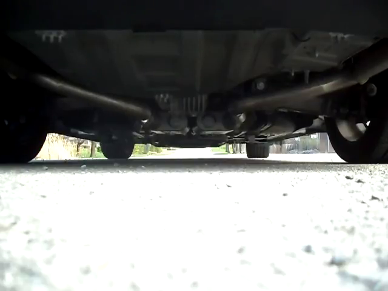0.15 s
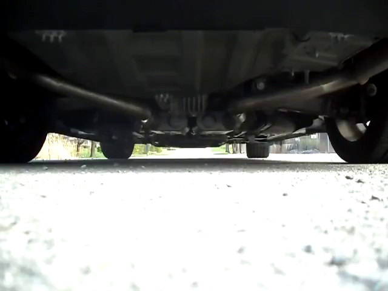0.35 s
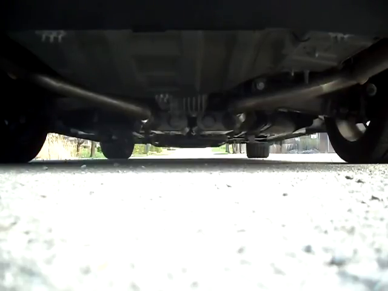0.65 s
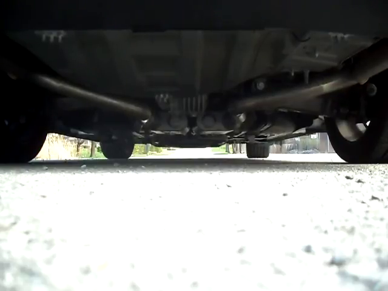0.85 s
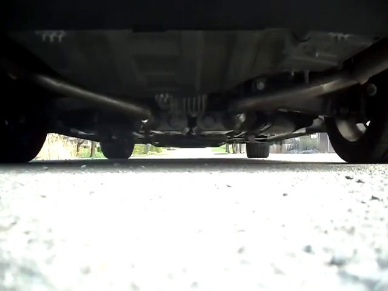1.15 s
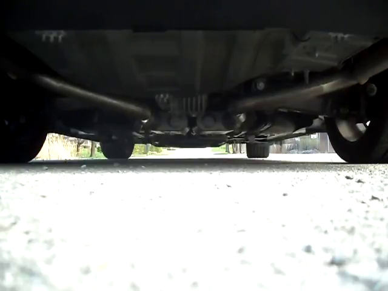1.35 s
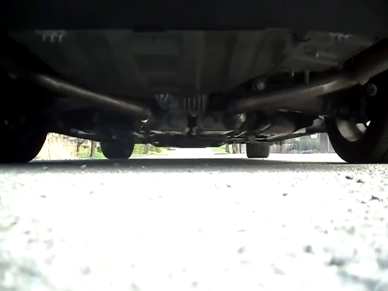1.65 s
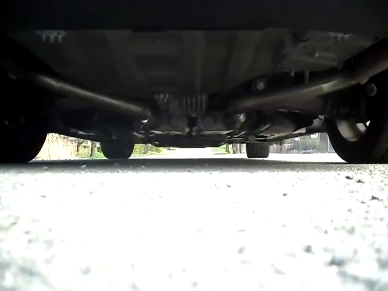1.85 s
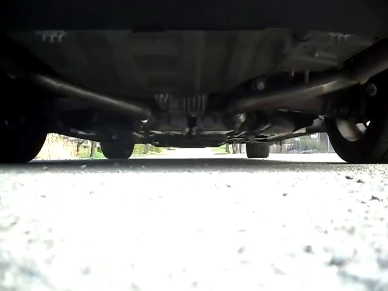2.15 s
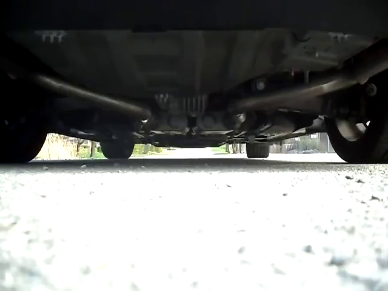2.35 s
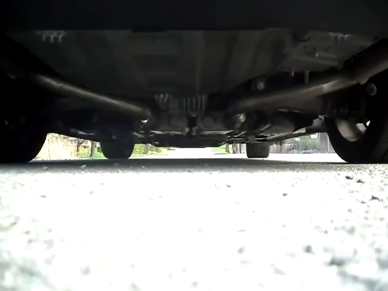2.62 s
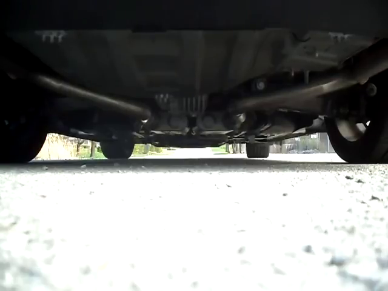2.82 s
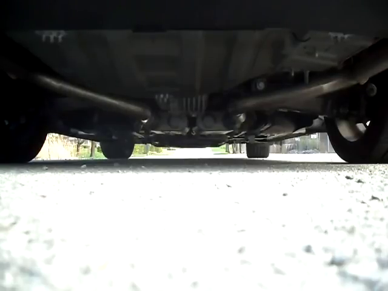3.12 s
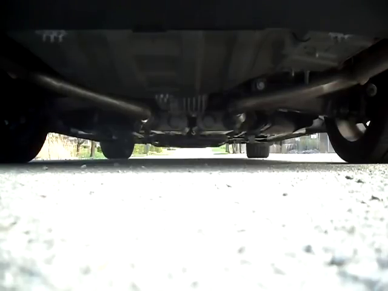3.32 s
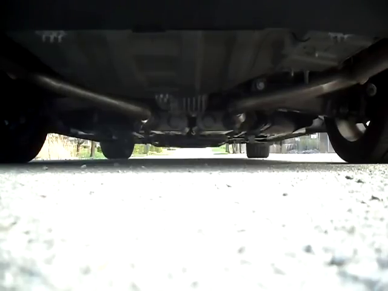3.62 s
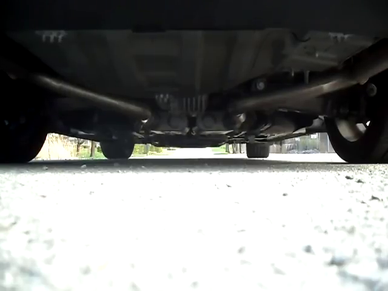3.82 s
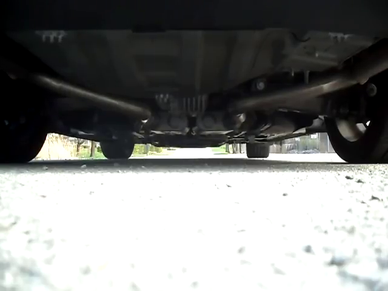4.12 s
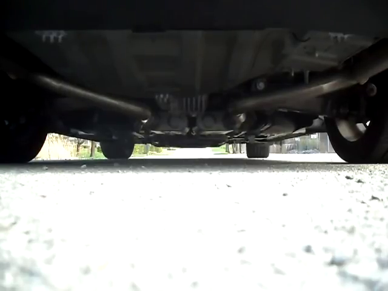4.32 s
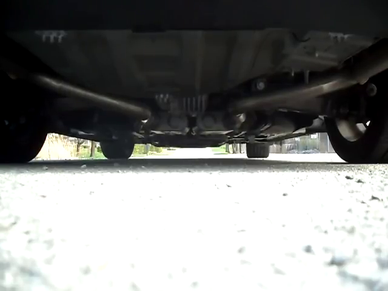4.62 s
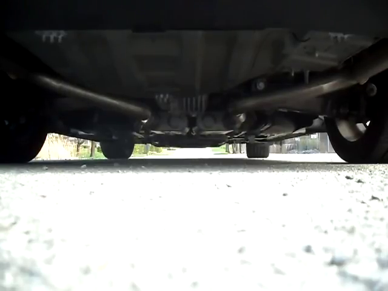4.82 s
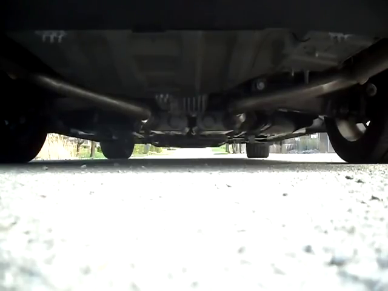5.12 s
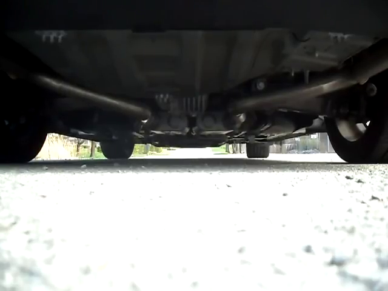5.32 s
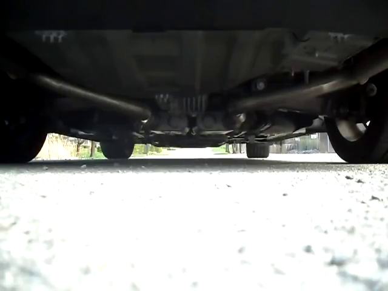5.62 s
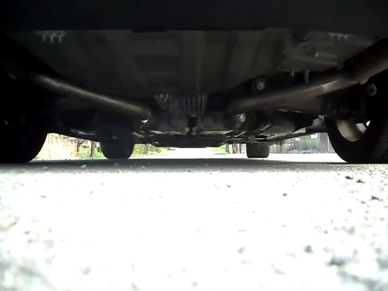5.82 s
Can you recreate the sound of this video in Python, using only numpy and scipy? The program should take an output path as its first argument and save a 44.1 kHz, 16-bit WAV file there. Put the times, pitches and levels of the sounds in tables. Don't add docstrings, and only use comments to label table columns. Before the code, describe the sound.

A V8 heard low under its tailpipes is blipped three times, popping and crackling on each lift, then sinks to a lumpy idle.

```python
import sys
import numpy as np
from scipy import signal
from scipy.fft import rfft, irfft
from scipy.io import wavfile
from scipy.ndimage import uniform_filter1d

SR = 44100
rng = np.random.default_rng(int(sys.argv[2]) if len(sys.argv) > 2 else 0)


def volts(x):
    e = np.asarray(x, float) / 20
    return 10 ** e


def unload_wav(signal):
    wavfile.write(
        sys.argv[1],
        SR,
        np.round(np.clip(np.atleast_2d(signal).T, -1, 1) * 32767).astype(np.int16),
    )


N = 262836


def in_time(rows):
    s, *columns = np.transpose(rows)
    return [np.interp(np.arange(N) / SR, s, c) for c in columns]


def rms_one(x):
    return x / np.sqrt(np.mean(x ** 2) + 1e-20)


def evened(x, seconds):
    size = int(seconds * SR)
    power = uniform_filter1d(uniform_filter1d(x ** 2, size), size)
    return x / np.sqrt(power + 1e-12)


def resonator(hz, width_hz):
    r = np.exp(-np.pi * width_hz / SR)
    return np.array([1, 0, -1]) * (1 - r * r) / 2, [1, -2 * r * np.cos(2 * np.pi * hz / SR), r * r]


def lowpass(x, hz):
    return signal.sosfilt(signal.butter(2, hz, fs=SR, output="sos"), x)


def coloured(spectrum):
    hz, db = np.transpose(spectrum)
    grid = np.fft.rfftfreq(N, 1 / SR) + 1
    gain = volts(np.interp(np.log(grid), np.log(hz), db))
    return rms_one(irfft(rfft(rng.standard_normal(N)) * gain, N))


def wander(turns, per_turn):
    return np.interp(turns * per_turn, np.arange(2000), rng.standard_normal(2000))


def snaps(events, hz, width_hz, gain_db):
    s, db = np.transpose(events)
    clicks = np.full(N, 1e-18)
    clicks[(s * SR).astype(int)] = volts(db + gain_db)
    mode = resonator(hz, width_hz)
    once = signal.lfilter(*mode, lowpass(clicks, hz + width_hz))
    return signal.lfilter(*mode, once)


# start_s, speed_cycles_per_s
CRANK_SPEED = [(0.0, 15.3), (0.22, 13.8), (0.295, 15.6), (0.39, 20.6), (0.53, 30.6), (0.61, 31.6),
               (1.4, 21.7), (1.47, 24.2), (1.73, 42.8), (1.795, 44.4), (3.06, 24.85), (3.17, 26.2),
               (3.36, 38.8), (3.41, 40.4), (3.47, 38.77), (5.38, 14.15), (5.52, 13.35), (5.96, 12.5)]


def crank():
    drag = 18
    straight, = in_time(CRANK_SPEED)
    sagging, = in_time([(s, np.log(v + drag)) for s, v in CRANK_SPEED])
    climbing = np.gradient(straight) > 0
    return np.minimum(straight, np.exp(sagging) - drag + 9 * climbing)


# press_s, lift_s, after_lift_db, brightness_db_per_octave, gas_flow_db
BLIPS = [
    (0.216, 0.556, -4.5, 1, -0.5),
    (1.413, 1.763, 1, .1, 2.5),
    (3.117, 3.379, -2, 0.4, 0),
]


def pedal():
    press_s, lift_s, settle_s = .08, .03, .27
    flow_lag_s, flow_rise_s = .031, .1
    cold_ratio, hot_rise, cool_s = .95, .14, .52
    dip_db, dip_s = -3.5, .02
    t = np.arange(N) / SR
    throttle, flow, heat, after_db, bright_db, flow_db = np.zeros((6, N))
    for press, lift, note_db, tilt_db, gas_db in BLIPS:
        shut, since = np.clip((t - lift) / lift_s, 0, 1), np.maximum(t - lift, 0)
        held = np.clip((t - press) / (lift - press), 0, 1)
        throttle += np.clip((t - press) / press_s, 0, 1) * (1 - shut)
        flow += np.clip((t - press - flow_lag_s) / flow_rise_s, 0, 1) * (1 - shut)
        heat = np.maximum(heat, held * np.exp(-since / cool_s))
        after_db += note_db * shut * np.exp(-since / settle_s)
        after_db += dip_db * np.exp(-((t - lift - lift_s / 2) / dip_s) ** 2)
        bright_db += tilt_db * held * (1 - shut)
        flow_db[t > press] = gas_db
    return throttle, flow, cold_ratio + hot_rise * heat, after_db, bright_db, flow_db


# start_s, peak_db
TICKS = [(0.9784, -53.5), (1.1857, -37), (2.8055, -58), (4.4094, -46), (4.467, -51), (4.7097, -37.5),
         (4.918, -35), (5.248, -34.5)]


def metal_ticks():
    return snaps(TICKS, hz=5000, width_hz=11000, gain_db=7.0)


# pitch_hz, level_db_per_hz
CLATTER = [(410, -37), (700, -5), (927, -2.5), (1070, -17), (1630, -20), (1860, -36), (2160, -28),
           (3310, -30.5), (4120, -33.5), (10100, -48), (13000, -66)]
# pitch_hz, width_hz, level_db
CASING = [(1754, 76, -63), (2220, 160, -71), (3280, 220, -79), (1910, 67, -72)]


def engine_block(speed, turns, rise_db):
    clatter = volts(-49.5) * coloured(CLATTER) * volts(2.6 * wander(turns, 23))
    knocks = rng.standard_normal(N) * volts(1.4 * wander(turns, 4.5))
    rings = np.zeros(N)
    for hz, width_hz, db in CASING:
        rings += volts(db) * rms_one(signal.lfilter(*resonator(hz, width_hz), knocks))
    return (clatter + rings) * volts(rise_db * np.log2(speed / 13))


def boom(flow):
    hang_s = .054
    r = np.exp(-1 / (hang_s * SR))
    band = signal.butter(2, [25, 83], "band", fs=SR, output="sos")
    low = signal.sosfilt(band, rng.standard_normal(N))
    return volts(-24.5) * rms_one(low) * signal.lfilter([1 - r], [1, -r], flow)


# pitch_hz, level_db_per_hz
HISS = [(900, -43.5), (1500, -5), (2000, 3), (2600, -16), (4000, -14.5), (5800, -12.5), (7000, -15.5),
        (10000, -24.5), (15000, -49.5)]


def gas_hiss(speed, turns, flow, flow_db, depth):
    octaves = np.log2(speed / 30)
    leak_db = -64.5
    coast_db = np.maximum(-61 + 33 * octaves + flow_db, leak_db)
    pull_db = -38.5 + 20.5 * np.maximum(octaves, -0.098) + flow_db
    puffs = 1 + depth * np.cos(2 * np.pi * 8 * turns)
    jet = coloured(HISS) * puffs * volts(1.5 * wander(turns, 4.0))
    return volts(coast_db + flow * (pull_db - coast_db)) * jet


def on_firing(events, note, lead_s):
    reach = int(.004 * SR)
    moved = []
    for s, db in events:
        first = int(s * SR) - reach
        peak = first + np.argmax(note[first:first + 2 * reach])
        moved.append((peak / SR - lead_s, db))
    return moved


# start_s, peak_db
POPS = [(0.384, -2), (0.431, -7.5), (0.45, -8), (0.469, -10), (0.488, -3.5), (0.505, -3), (0.538, -5),
        (0.63, -12), (1.108, -22), (1.145, -19), (1.44, -16), (1.474, -14), (1.516, -0.5), (3.932, -21.5),
        (4.429, -18), (4.513, -16), (4.836, -27), (4.892, -22.5), (4.992, -22), (5.057, -16), (5.116, -15),
        (5.177, -26), (5.23, -22)]


def fuel_pops(note):
    return snaps(on_firing(POPS, note, .0003), hz=600, width_hz=455, gain_db=27.0)


# start_s, crack_db
CRACKS = [
    (2.442, -14),
    (3.4217, -12.5),
    (3.7723, -16),
]


def overrun_cracks(note, turns):
    t, rows = np.arange(N) / SR, []
    for s, db in CRACKS:
        first_turn = np.interp(s, t, turns)
        for k in range(6):
            for place, peak_turn in ((0, 1.9), (.25, 3.3)):
                when = np.interp(first_turn + k + place, turns, t)
                rows.append((when, db - .8 * (k - peak_turn) ** 2))
    return snaps(on_firing(rows, note, .0004), hz=450, width_hz=700, gain_db=31.0)


# multiple_of_engine_cycle, coasting_db, pulling_db, idling_db
PATTERN = [(0.998, -7, -1.5, -7), (2.014, -6.5, -1.5, -4.5), (3.02, -6, -14, -5.5),
           (4.01, -5.5, -11.5, 1.5), (5.017, 1, -4, -10), (6.036, -1.5, -5.0, -5), (7, 6, -7.5, -13),
           (8.021, 9.5, 11, 17.5), (8.96, 5.5, 1, 1.2), (10.038, 7.5, 8.5, 5.5), (11.03, 7.5, -0.7, 3),
           (11.994, 0.3, -1.5, 0), (13.06, 0.9, -7, 2), (14.015, 0.5, 4.5, 6.5), (14.955, 4, 0.5, -3.5),
           (15.944, 7, 4.5, 0.4), (17.15, 5.5, 0, 4.5), (18, 3.2, 10.5, -0.7), (19.09, -0.7, 4, -0.3),
           (20, 1, 5.5, 1.5), (21.03, -2, 8, -0.5), (21.89, -4.5, 2, 4.5), (23.1, 2.2, -1.4, 0.5),
           (24.04, 1.5, 8, 3.5), (25, -0.7, 3.5, 2.7), (26.23, 1, 5.5, 0.8), (26.46, -2.3, 3.5, 1),
           (27.8, -1.5, 6.5, -3), (28.32, 0, 5, 0.7), (30.4, -1, 4, 3.5)]


def firing_pattern(speed, turns, throttle, idle, tilt_db, wobble_db, uneven_db, scatter):
    out, lags = np.zeros(N), rng.standard_normal(len(PATTERN))
    for (k, coast_db, pull_db, idle_db), lag in zip(PATTERN, lags):
        between = k % 8 > 0
        coasting_db = coast_db + between * uneven_db * np.log2(speed / 30)
        level_db = coasting_db + throttle * (pull_db - coasting_db) + idle * (idle_db - coasting_db)
        level_db = level_db + tilt_db * np.log2(k * speed / 250) + wobble_db * wander(turns, .25)
        out += volts(level_db) * np.cos(2 * np.pi * k * turns + between * scatter * lag)
    return out


def uneven_firings(turns, soft_hz):
    at = np.flatnonzero(np.diff(np.floor(8 * turns)))
    clicks = np.full(N, 1e-18)
    clicks[at] = rng.standard_normal(2000)[:len(at)]
    return lowpass(clicks, soft_hz)


# pitch_hz, width_hz, level_db
PIPE = [(40.8, 62.6, -15.5), (131.5, 9.7, 0.5), (239.8, 15.9, -3.5), (310.5, 72, -15), (360.6, 15.6, -6),
        (494.2, 15.3, -7.5), (610.5, 26.9, -9), (635.3, 60, -18), (706, 60, -18.5), (870, 18, -27),
        (911, 150, -41), (1205, 100, -28), (1800, 73, -29)]


def pipe(x, sound_speed, damping, size=1536):
    out = np.zeros(x.shape)
    for k, (hz, width_hz, db) in enumerate(PIPE):
        state = np.zeros((len(x), 2))
        for i in range(0, N, size):
            mode = resonator(hz * sound_speed[i], width_hz * damping[i])
            ring, state = signal.lfilter(*mode, x[:, i:i + size], zi=state)
            out[:, i:i + size] += (-1) ** k * volts(db) * ring
    return out


MAP_SPEEDS = [12.6, 13.6, 14.5, 16.2, 18.5, 21.3, 24.5, 27, 29.5, 32.4, 34, 37, 44.5]
# coasting_db, pulling_db, coasting_tilt_db_per_octave, pulling_tilt_db_per_octave
LOAD_MAP = [(-22.5, -16, -1.5, -6), (-21.5, -9, -3, -6.5), (-15, -13, -4.5, -6), (-12, -7, -1, -9.5),
            (-17.3, -9.5, -0.8, -8), (-17, -10, -1.9, -4), (-15.5, -13, -0.2, -2.5), (-16, -13, -2.5, -0.9),
            (-14, -13, -3, -0.3), (-13, -9.5, 0.1, .1), (-13.5, -7.5, -0.5, -0.5), (-11, -8, -1.1, -1.2),
            (-9.5, -9, -0.9, -0.1)]


def exhaust_note(speed, turns, throttle, sound_speed, after_db, bright_db):
    columns = np.transpose(LOAD_MAP)
    coast_db, pull_db, coast_tilt, pull_tilt = [np.interp(speed, MAP_SPEEDS, c) for c in columns]
    note_db = coast_db + throttle * (pull_db - coast_db) + after_db
    tilt_db = coast_tilt + throttle * (pull_tilt - coast_tilt) + bright_db
    lumpy = np.clip(14 - speed, 0, 1)
    idle = np.clip((17.8 - speed) / 1.2, 0, 1) * (1 - throttle) * (1 - 0.29 * lumpy)
    pattern = firing_pattern(speed, turns, throttle, idle, tilt_db, wobble_db=1.2, uneven_db=5.5, scatter=1.3)
    pulses = np.array([pattern, uneven_firings(turns, soft_hz=1250)])
    steady, rough = pipe(pulses, sound_speed, damping=1 + 1.32 * throttle)
    rough_db = -21 + 8 * throttle + 9 * lumpy
    balance = evened(steady, .07) + volts(rough_db) * evened(rough, .15)
    source_db = note_db - .9 + 0.22 * np.maximum(note_db + 15.5, 0)
    lope = volts(-30.5) * lumpy * np.cos(2 * np.pi * 4 * turns)
    return volts(source_db) * balance + lope


def scene():
    speed = crank()
    turns = np.cumsum(speed) / SR
    throttle, flow, sound_speed, after_db, bright_db, flow_db = pedal()
    metal = metal_ticks() + engine_block(speed, turns, rise_db=7.0)
    hiss = gas_hiss(speed, turns, flow, flow_db, depth=0.19)
    note = exhaust_note(speed, turns, throttle, sound_speed, after_db, bright_db)
    pops = fuel_pops(note) + overrun_cracks(note, turns)
    return (metal + boom(flow) + hiss + pops + note)[None]


def top_cut(x):
    return signal.sosfilt(signal.butter(12, 15740, fs=SR, output="sos"), x)


def record(dry):
    bend, clip = 1.3, .72
    capsule = np.expm1(bend * dry) / bend
    coupled = signal.sosfilt(signal.butter(1, 25.0, "high", fs=SR, output="sos"), capsule)
    mix = lowpass(np.clip(coupled, -clip, clip), 10500.0)
    return top_cut(mix)


dry = scene()
out = record(dry)
unload_wav(out)
```